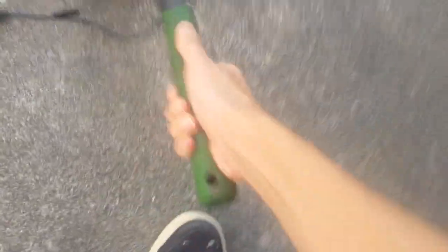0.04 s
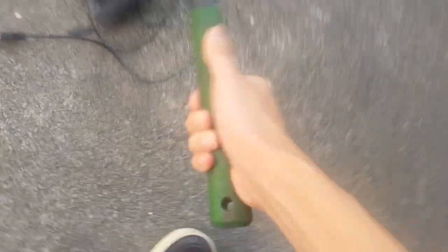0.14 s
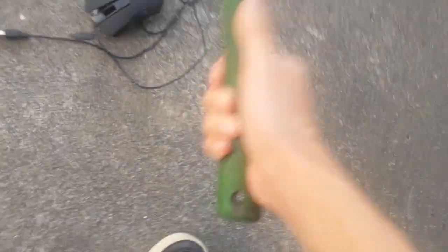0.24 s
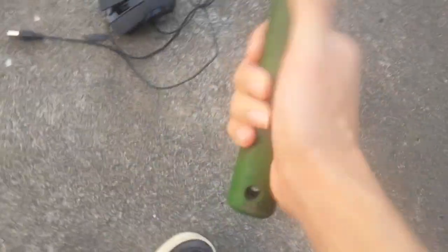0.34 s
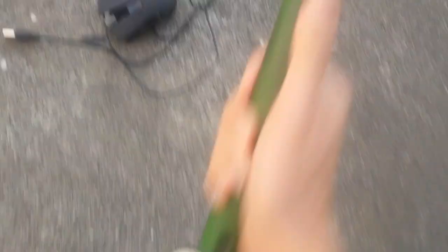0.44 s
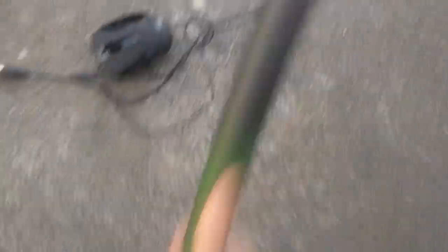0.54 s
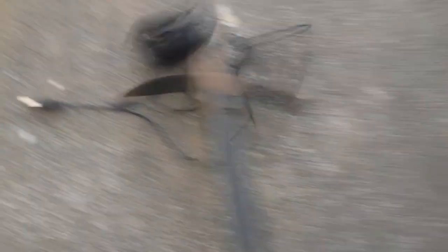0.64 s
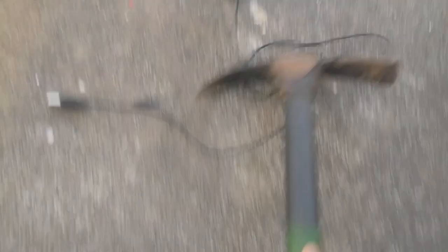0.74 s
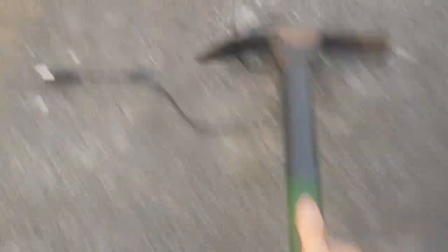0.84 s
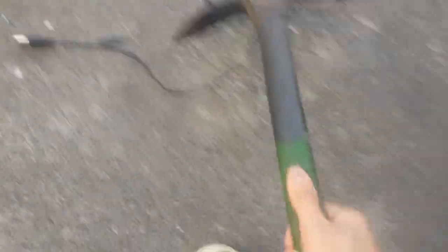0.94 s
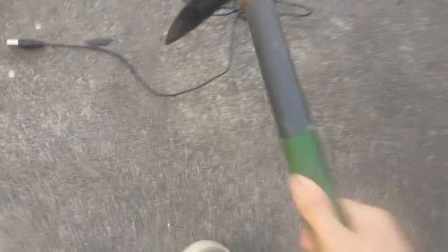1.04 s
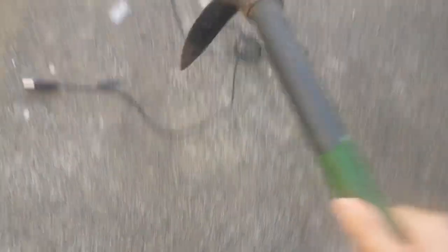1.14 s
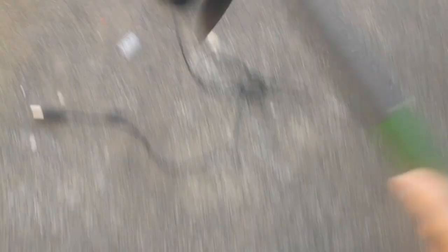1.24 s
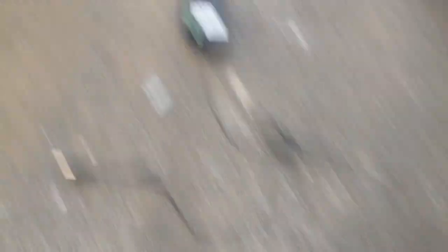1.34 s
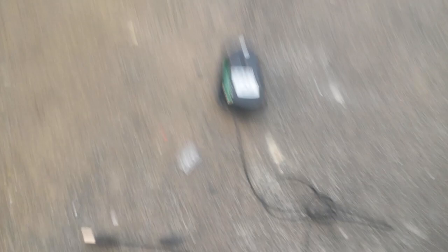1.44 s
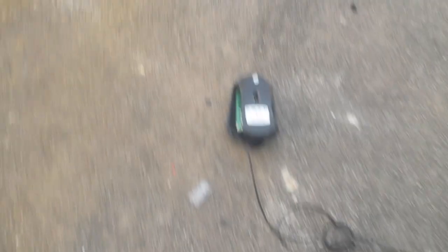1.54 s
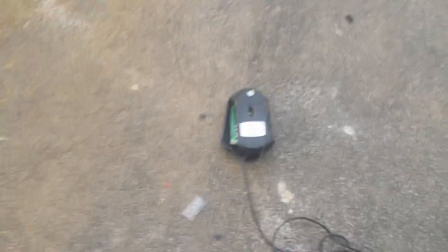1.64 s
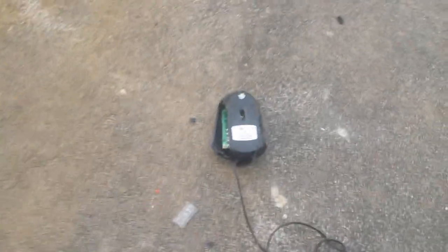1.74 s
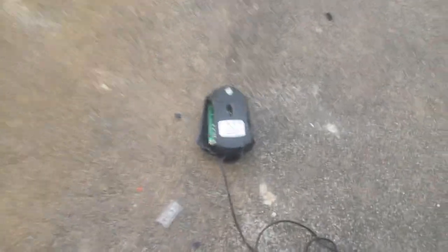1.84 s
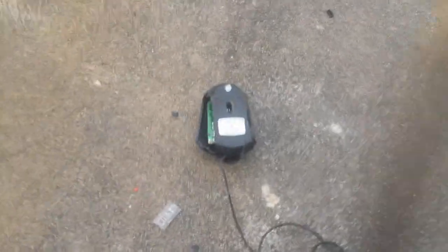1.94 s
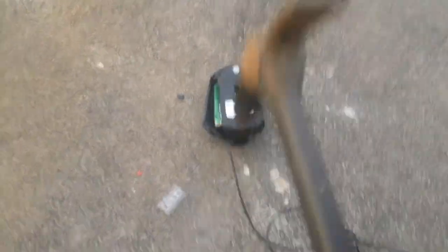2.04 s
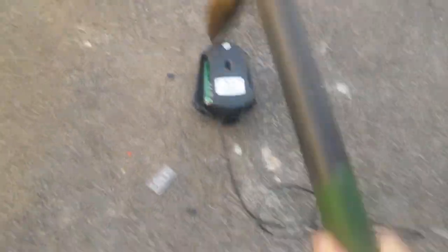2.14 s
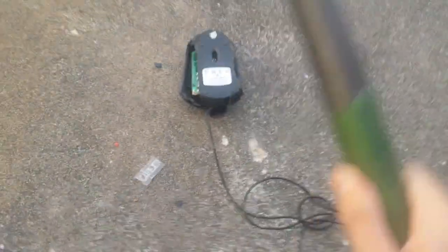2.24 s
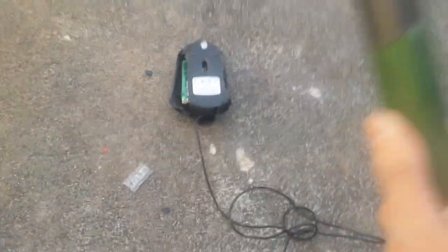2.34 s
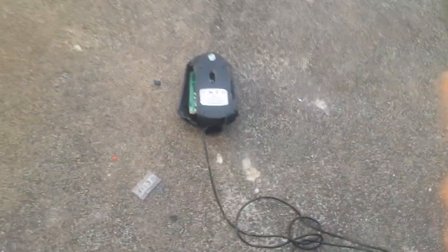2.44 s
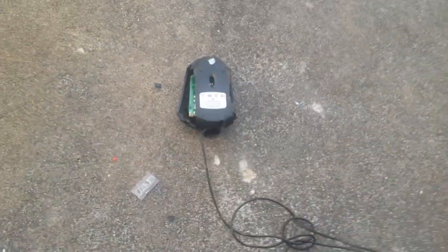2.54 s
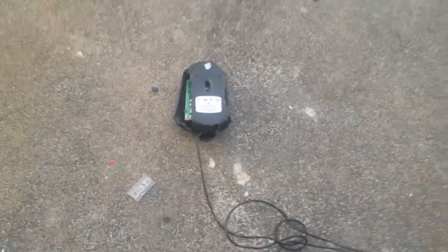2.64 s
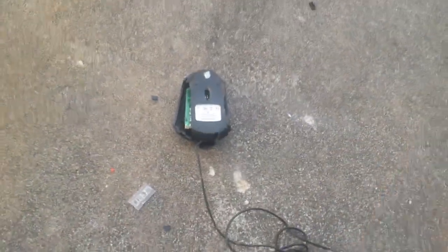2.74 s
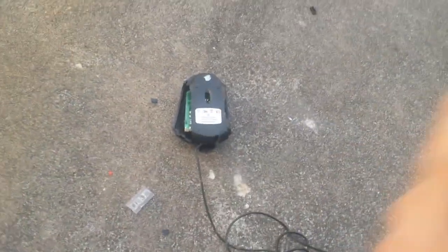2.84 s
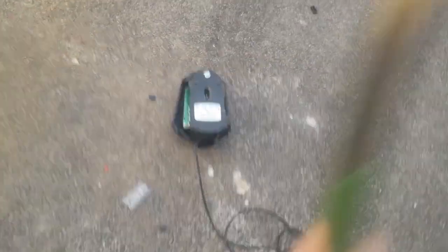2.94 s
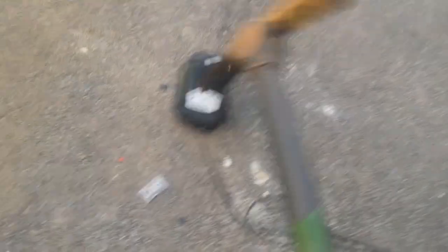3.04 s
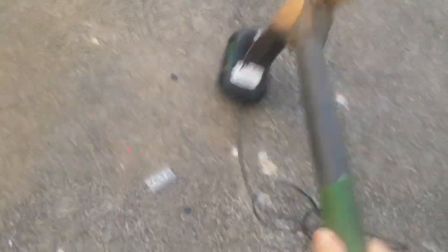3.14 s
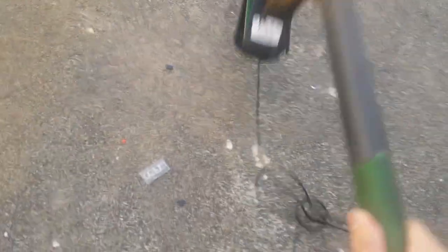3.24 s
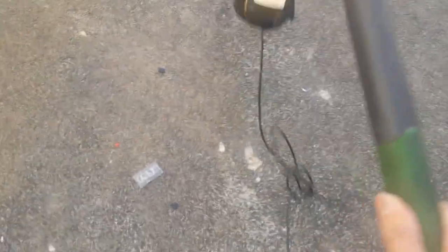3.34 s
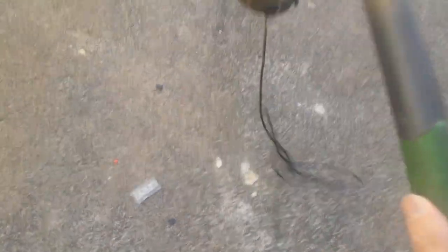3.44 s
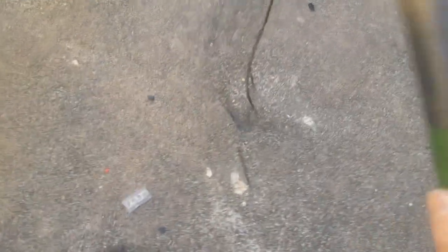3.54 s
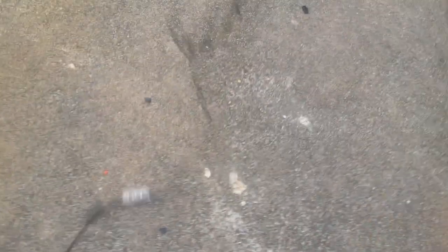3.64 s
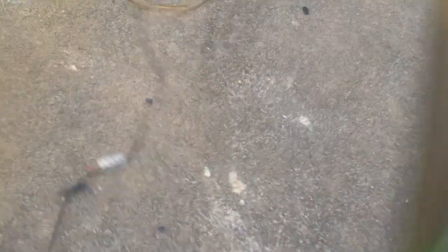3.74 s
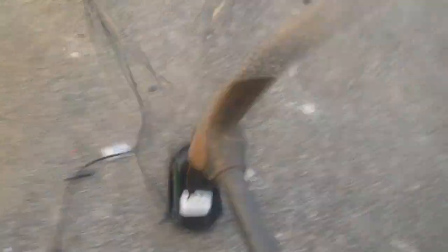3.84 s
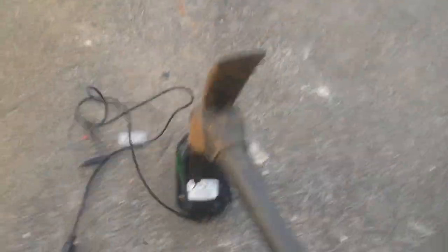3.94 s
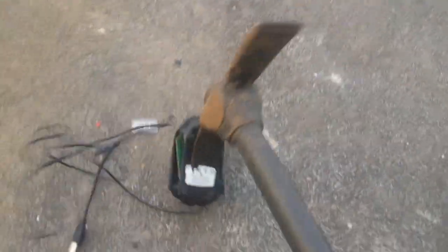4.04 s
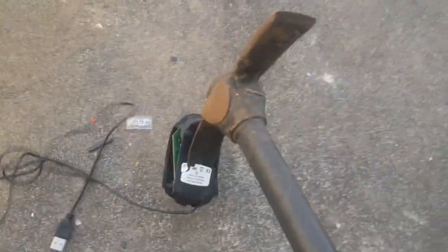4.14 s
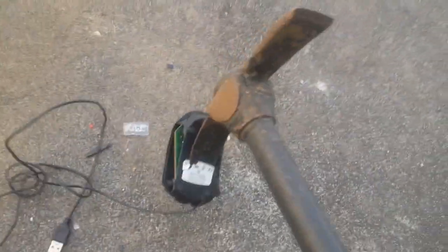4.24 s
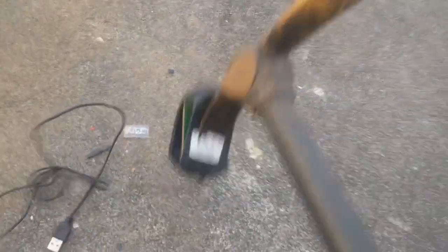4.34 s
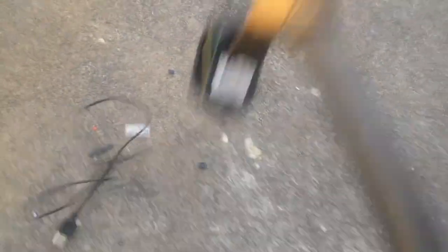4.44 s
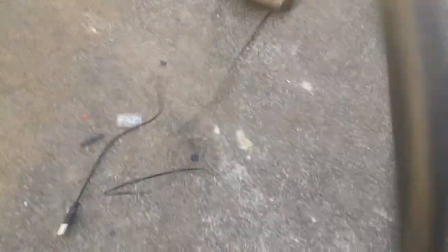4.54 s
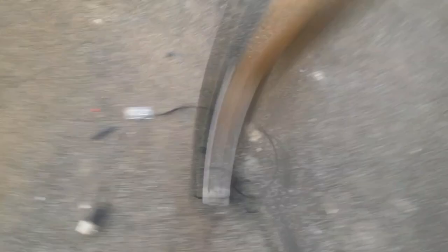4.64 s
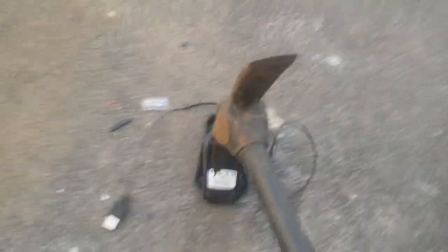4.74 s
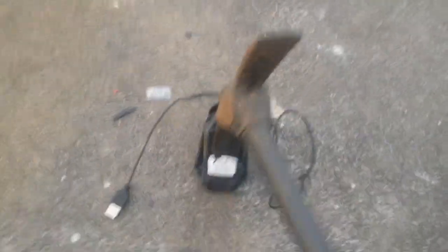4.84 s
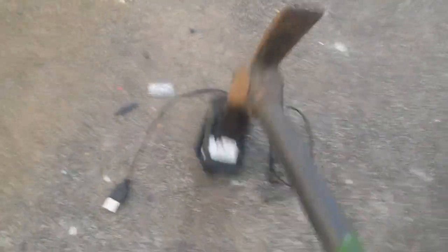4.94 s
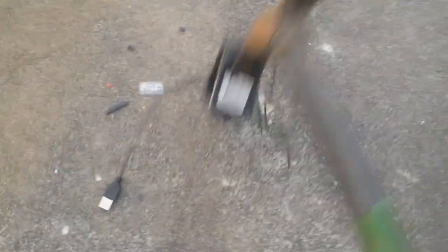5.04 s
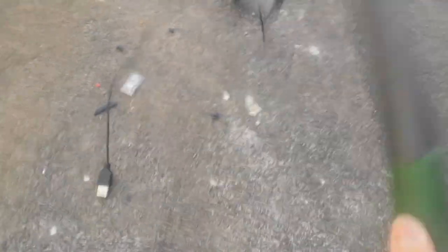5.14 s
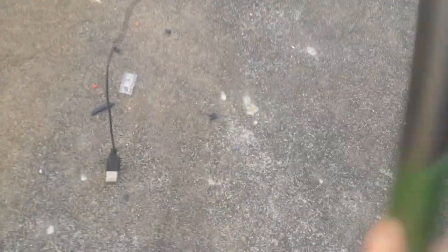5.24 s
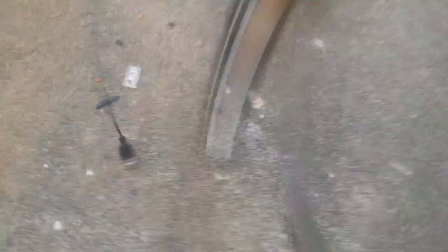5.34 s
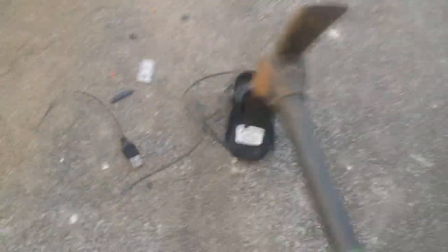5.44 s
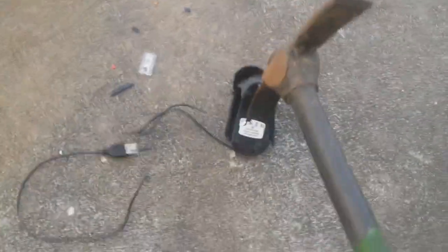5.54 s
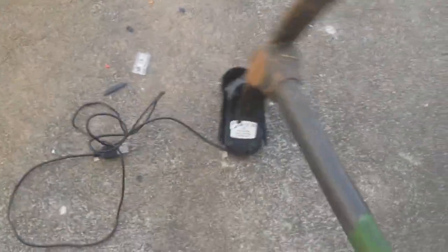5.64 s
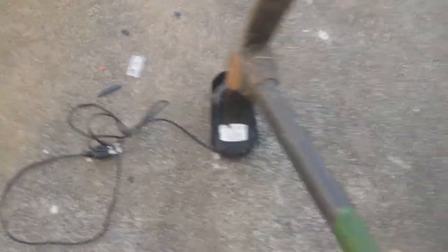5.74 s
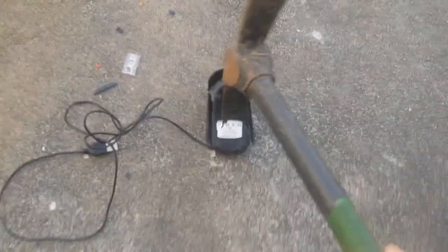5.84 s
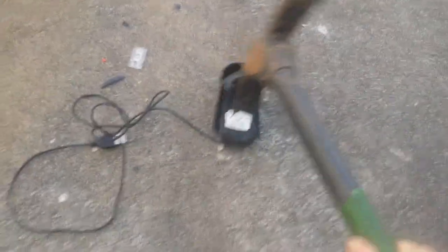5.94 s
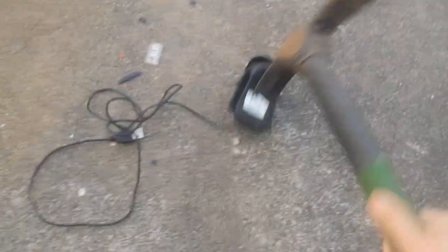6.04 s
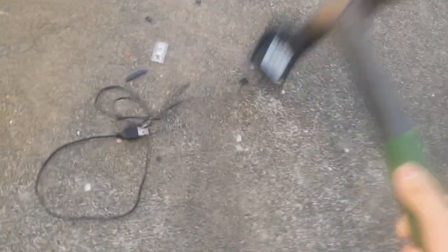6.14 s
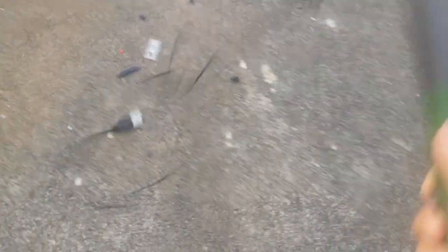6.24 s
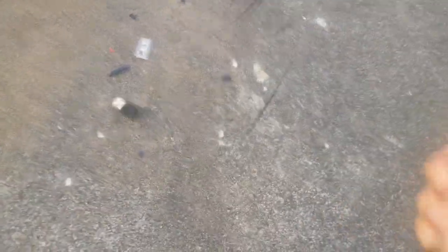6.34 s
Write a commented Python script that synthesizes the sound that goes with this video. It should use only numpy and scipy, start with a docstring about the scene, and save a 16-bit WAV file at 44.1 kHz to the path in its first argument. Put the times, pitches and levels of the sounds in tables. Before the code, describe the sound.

A light metallic tick and small plastic rattles lead to a loud pick blow with a steel ring on concrete. Five more blows follow, first after a longer pause, then roughly every second or less, each a dry plastic crack with a short low thud. The broken shell scrapes and tumbles between them. Very quiet moving air, distant engine and a few bird calls; close, bright stereo pickup.

```python
"""A steel pick smashes a plastic computer mouse on concrete, six blows, close to a hand-held camera.
Each blow is a burst of tiny cracks, shaped noise, over a decaying low sine and a short panel resonance.
Between blows the shell clatters and skids as noise grains; pick head and cable plug ring as dying sines.
Walls answer briefly as scattered echoes. Far off, gliding sines make an engine speeding up and bird
calls, over noise for traffic and moving air. Two microphone ports colour it all and overload softly."""
import sys
import numpy as np
from scipy import signal
from scipy.io import wavfile
from scipy.ndimage import uniform_filter1d

SR = 44100
rng = np.random.default_rng(int(sys.argv[2]) if len(sys.argv) > 2 else 0)


def transcribe(signal):
    """Save signal, clipped to [-1, 1], as a 16-bit WAV file at the path in sys.argv[1]."""
    frames = np.atleast_2d(signal).T
    limited = np.clip(frames, -1, 1)
    pcm = np.round(limited * 32767).astype(np.int16)
    wavfile.write(sys.argv[1], SR, pcm)


N = 282240

# Levels in the event tables are relative: each layer adds its own gain, then the microphone colours it.

# Background
# air spectrum: freq_hz, level_db
AIR_SPECTRUM = [(20, -23.5), (50, -10.5), (110, 1.5), (200, -3), (350, -9.5), (700, -12), (1300, -16.5),
                (2400, -25.5), (4500, -26.5), (7000, -33.5), (9000, -36), (12000, -51.5), (16000, -60.5)]
# air, likeness of left and right: freq_hz, likeness (-1 to 1)
AIR_LIKENESS = [(60, 0.81), (200, 1), (640, .5), (1400, -0.47), (3000, 0), (15000, -0.21)]
# the air swells and sinks again: top_s, rise_s, fall_s, rumble_db, rush_db
SWELLS = [(0.901, 0.66, 0.15, -4, 6.5), (2.019, 0.21, 0.11, 11, 11), (2.5, .1, 0.15, 5.5, 1.5)]
# far engine, one curve for each run up through a gear: time_s, pitch_hz, hum_db, whine_db
ENGINE_RUNS = [
    [(0, 100.4, -54, -52), (.12, 110.8, -67, -73.5), (.4, 118.1, -58.5, -71), (.58, 124.7, -57.5, -69),
     (1.0, 132.7, -68.5, -80)],
    [(3.3, 129.1, -65, -87.5), (4.5, 172.2, -68.5, -91), (5.25, 180.7, -59.5, -99.5),
     (5.95, 197.8, -64.5, -98), (6.4, 225.7, -65, -91)],
]
# whine on multiples of the engine's pitch: multiple, level_db
WHINE_ORDERS = [(3, -3), (5, 1), (9, 0)]
# far birds: start_s, length_s, start_hz, end_hz, level_db
CHIRPS = [(2.29, 0.053, 811, 810, -65), (2.594, 0.043, 3600, 3720, -76.5),
          (2.735, 0.071, 3850, 3510, -74.5), (3.494, 0.16, 4760, 4160, -74)]
# tail from the walls: freq_hz, t60_s
WALL_DECAY = [(100, 0.35), (700, 0.38), (2000, 0.4), (7000, 0.44), (11000, 0.34), (16000, 0.13)]
# wall tail, likeness of left and right: freq_hz, likeness (0 to 1)
WALL_LIKENESS = [(60, 0.8), (130, 1), (290, 0.99), (640, 0.03), (1400, 0.6), (3100, 0.01), (6800, 0.04)]

# Cable plug
# the metal plug is jerked up and bounces: start_s, level_db, first_hop_s,
# hop_ratio (each hop as a share of the one before), first_bounce_loss_db
PLUG_HOPS = [(0.0354, -28.5, .047, .7, 16), (0.9158, -16.5, .1215, .565, 12.5),
             (3.7075, -43, .0395, .85, -1), (5.1257, -43, .0458, .78, 4)]
# the plug is dragged along and its sleeve sings: start_s, length_s, level_db
PLUG_SLIDES = [(1.11, .025, -65), (3.694, 0.044, -57.5), (5.131, 0.316, -72)]
# modes of the plug's sleeve: freq_hz, level_db, t60_s (at damping 1)
PLUG_MODES = [(8400, 11.5, 0.051), (6430, 2, 0.016), (7340, 1, 0.0098)]
# spectrum of the plug's tick: freq_hz, level_db
TICK_SPECTRUM = [(1000, -33), (4500, -7), (6000, -8), (8300, -6), (9500, -9), (16000, -26.5)]

# Plastic shell
# the shell and its cable drag over the concrete: start_s, length_s, grit_db
SKIDS = [(0.165, 0.071, -51), (1.002, 0.22, -56.5), (1.754, 0.024, -54.5), (3.086, 0.025, -34),
         (3.125, 0.054, -30), (3.797, 0.03, -46.5), (5.112, 0.24, -64), (6.073, 0.032, -53.5)]
# the shell drops back on one edge, then the other, skidding as it lands: start_s, crack_db,
# hollow_db (body relative to the crack), edge_gap_s, skid_db
LANDINGS = [(0.939, -29, -24, 0.0075, -31.5), (3.1647, -18.5, -28, 0.016, -29),
            (3.9864, -19.5, -31, 0.0048, -56), (4.7995, -12.5, -14.5, 0.0031, -56),
            (5.4926, -13.5, -17.5, .003, -37)]
# single knocks as the shell is nudged, snaps further or tips over: start_s, crack_db
CLATTER = [(0.2098, -33), (0.2828, -42), (0.3317, -45.5), (0.839, -26), (3.0736, -8), (3.0915, -7.5),
           (3.1055, -13), (3.8164, -35), (3.8278, -35), (3.8357, -34.5), (3.8672, -28.5), (3.8881, -29),
           (3.9017, -20.5), (4.6084, -45), (4.7043, -27.5), (4.718, -20.5), (4.985, -46), (5.3762, -42),
           (5.7272, -30), (5.7414, -46.5), (5.8033, -36), (5.9849, -30.5), (6.0357, -42), (6.119, -31.5),
           (6.1584, -37.5)]
# flying chips hit something right by the microphone: start_s, crack_db, hollow_db (relative to the crack)
CHIPS = [(2.1237, -9.5, -9.5), (2.1529, -18, -8)]
# spectrum of cracking plastic, also used for grit: freq_hz, level_db
CRACK_SPECTRUM = [(200, -37), (2000, -4), (4500, 1.5), (7000, 1), (9500, -2.5), (12000, -5.5), (16000, -6)]
# spectrum of the hollow shell: freq_hz, level_db
BODY_SPECTRUM = [(100, -16), (350, -8), (600, -12), (900, -7.5), (1300, -11), (2050, -1.5), (2600, -3.5),
                 (3400, -1.5), (4300, -6), (5500, -11.5), (9000, -30)]

# Blows of the pick
# steel meets concrete: start_s, knock_db, grit_db, ring_db, damping (factor on the decay rate)
STRIKES = [(0.7, -11.5, -25, -25.5, 1.37), (0.705, -15.5, -21.5, -15.5, 0.82), (0.7557, -23, -30.5, -41, 2),
           (2.0675, -33, -12, -16.5, 1.3)]
# modes of the pick head: freq_hz, level_db, t60_s (at damping 1)
STEEL_MODES = [(725, -20, .28), (860, -25, .08), (2907, -10, .11), (2982, -2, .1), (3031, -7, .16),
               (3607, -24, .15), (5825, -22, .1), (7290, -17, .1), (7935, 0, .14)]
# spectrum of steel on stone: freq_hz, level_db
KNOCK_SPECTRUM = [(100, -22.5), (600, -11.5), (1200, 0.5), (1900, 0.5), (3000, 2), (4500, -4), (9000, -24),
                  (16000, -29)]
# the blow reaches the floor and puffs air at the microphone: start_s, level_db, pitch_hz,
# decay_s, left_minus_right_db
THUDS = [(0.7, -31, 210.2, 0.0081, 2), (2.063, -18.5, 214.4, 0.0049, 0), (3.065, -22.5, 233, 0.0032, 9.5),
         (3.073, -23, 129.3, 0.0034, 15), (3.908, -19, 148.5, 0.0017, 5),
         (4.725, -30.5, 207.8, 0.012, -3.5), (5.423, -25, 222, 0.0064, 1)]
# the pick crushes the shell: start_s, crack_db, hollow_db (relative to the crack), crush_s, # panel_hz (pitch
# of a short resonance: the breaking panel, at the second blow a low knock of the pick on the concrete), #
# panel_db (relative to the crack)
BLOWS = [(0.6776, -7, -19, 0.0053, 3057, -4.5), (2.0624, -11.5, -7.5, 0.006, 824, -7.5),
         (3.0622, -6, -12, 0.0061, 2037, -6.5), (3.9054, -9.5, -18, 0.0072, 3400, -31.5),
         (4.7237, -6, -16, 0.0053, 2573, -10.5), (5.4212, -14, -12, 0.013, 2450, -28)]

# Microphone
# colour of the left port with its cavity peak: freq_hz, level_db
LEFT_PORT = [(100, -1), (700, 1.5), (1400, 0), (2300, 1), (3300, -1), (5000, 3.5), (5900, 10), (6750, 16.5),
             (7700, 9.5), (9000, 3), (11000, -6), (15500, -9)]
# colour of the right port with its cavity peak: freq_hz, level_db
RIGHT_PORT = [(100, -1), (700, 0.5), (1400, 2), (2100, 2.5), (3300, -5), (5000, -3.5), (5900, -6.5),
              (6750, 2.5), (7500, 10), (8000, 10.5), (9000, 2.5), (11000, -0.5), (15500, -12)]

RUMBLE_DB, RUSH_DB, HISS_DB = -60.5, -65.5, -72  # resting rms of the air's bass, middle and treble
HISS_FOLLOWS = 0.69  # dB of hiss for each dB that the rush swells
SKID_LEAD_S, SKID_S = 0.014, 0.044  # a landing's skid starts just before the first edge hits
SKID_HOLLOW_DB = -9.5  # hollow body relative to the grit
CLATTER_CONTACT_S, LANDING_CONTACT_S = 0.0041, 0.0031
SECOND_EDGE_DB = 1  # second edge of a landing relative to the first
# hollow body relative to a crack of this table level; softer knocks are hollower (dB per dB)
HOLLOW_DB, HOLLOW_AT_DB, HOLLOW_SLOPE = -19.5, -31.5, 0.74
# overtone of the thud: multiple of its pitch, relative level, longest decay time
THUD_OVERTONE, THUD_OVERTONE_DB, THUD_OVERTONE_DECAY_S = 1.6, -7, 0.0033
OVERLOAD_LEVEL = 0.72  # ceiling of the soft overload
BAND_EDGE_HZ = 15900


def amp(db):
    """Decibels to gain."""
    return 10 ** (np.asarray(db) / 20)


def evened(x):
    """Scales to rms 1."""
    return x / np.sqrt(np.mean(x ** 2) + 1e-20)


def read(points, hz):
    """Reads a table on a log-frequency axis."""
    f, value = np.transpose(points)
    return np.interp(np.log(hz + 1), np.log(f + 1), value)


def add(mix, s, sound):
    """Mixes a sound in at time s, cut off at the end of the mix."""
    start = max(round(s * SR), 0)
    part = mix[:, start:][:, :sound.shape[-1]]
    part += sound[..., :part.shape[1]]


def causal(points, size=1024):
    """The shortest impulse response with this spectrum (minimum phase)."""
    hz = abs(np.fft.fftfreq(size, 1 / SR))
    log_gain = np.log(amp(read(points, hz)))
    return np.fft.ifft(np.exp(np.conj(signal.hilbert(log_gain)))).real


def blend(likeness, first, second):
    """A left and right pair of equal power, alike by the given share in each band."""
    right = likeness * first + np.sqrt(1 - likeness ** 2) * second
    return np.array([first, right])


def ring(modes, damping=1, size=16384):
    """Dying sines, one for each mode; damping speeds up every decay."""
    t = np.arange(size) / SR
    tone = np.zeros(size)
    for hz, db, t60 in modes:
        tone += amp(db - 60 * damping * t / t60) * np.sin(2 * np.pi * hz * t)
    return tone


def fracture(spectrum, length, spread_db=3.0, apart=0.8, size=2048):
    """A burst of tiny cracks of uneven size, of rms 1 over its length; high ones differ between the ports."""
    t = np.arange(size) / SR
    length = max(length, 1e-4)
    sizes = amp(spread_db * np.repeat(rng.standard_normal(size // 16), 16))
    force = (1 - np.exp(-t / (0.15 * length))) * np.exp(-(t / length) ** 2)
    cracks = rng.standard_normal((3, size)) * sizes * force
    # one row is shared by both ports, the other two add separate treble
    treble = signal.lfilter(*signal.butter(1, 4500, "high", fs=SR), cracks[1:])
    burst = signal.fftconvolve(cracks[0] + apart * treble, causal(spectrum)[None], axes=1)
    return burst * np.sqrt(2 * length * SR / np.sum(burst ** 2))


def air(patchy_db=2.0):
    """Far traffic and moving air: noise whose rumble and rush swell now and then; the hiss follows the rush."""
    hz = np.fft.rfftfreq(2048, 1 / SR)
    a, b, c, d, patches = rng.standard_normal((5, len(hz), N // 512 + 5))
    likeness = np.clip(read(AIR_LIKENESS, hz), -1, 1)[:, None]
    noise = blend(likeness, a + 1j * b, c + 1j * d)
    # smoothing over frequency, then time, leaves slow uneven patches
    patches = uniform_filter1d(uniform_filter1d(patches, size=6, axis=0), size=10, axis=1)
    noise = noise * amp(read(AIR_SPECTRUM, hz)[:, None] + patchy_db * evened(patches))

    t, rumble, rush = np.arange(N) / SR, 0, 0
    for s, rise, fall, rumble_db, rush_db in SWELLS:
        swell = np.exp(-abs(t - s) / np.where(t < s, rise, fall))
        rumble = rumble + rumble_db * swell
        rush = rush + rush_db * swell
    levels = RUMBLE_DB + rumble, RUSH_DB + rush, HISS_DB + HISS_FOLLOWS * rush

    band = np.digitize(hz, [300, 2500])[:, None]  # 0 rumble, 1 rush, 2 hiss
    out = np.zeros((2, N))
    for k, db in enumerate(levels):
        sound = signal.istft(noise * (band == k), nperseg=2048, noverlap=1536)[1][:, :N]
        out += amp(db) * evened(sound)
    return out


def glide(rows, waver):
    """A distant tone that follows its pitch and level curve (s, Hz, dB) and wavers on the way."""
    s, hz, db = np.transpose(rows)
    t = np.arange(s[0], s[-1], 1 / SR)
    knots = np.linspace(0, N / SR, 200)
    drift, fade = (np.interp(t, knots, v) for v in rng.standard_normal((2, 200)))
    turns = np.cumsum(np.interp(t, s, hz) * (1 + waver * drift)) / SR
    level = np.sqrt(2) * amp(np.interp(t, s, db) + 2 * fade)
    return level * np.sin(2 * np.pi * turns) * signal.windows.tukey(len(t), 0.3)


def engine(hum_gain_db=-1):
    """A far engine speeding up: a hum at its pitch and a whine on multiples of it."""
    out = np.zeros((2, N))
    for run in ENGINE_RUNS:
        start = run[0][0]
        hum = [(s, hz, db) for s, hz, db, _ in run]
        add(out, start, amp(hum_gain_db) * glide(hum, waver=0.0073))
        for multiple, order_db in WHINE_ORDERS:
            whine = [(s, multiple * hz, db + order_db) for s, hz, _, db in run]
            add(out, start, glide(whine, waver=0.006))
    return out


def birds():
    """Far birds, each call one tone sliding from its start pitch to its end pitch."""
    out = np.zeros((2, N))
    for s, length, start_hz, end_hz, db in CHIRPS:
        add(out, s, glide([(s, start_hz, db), (s + length, end_hz, db)], waver=0.0159))
    return out


def walls(x, near_db=-6.5, near_t60=0.13, far_db=-22, build_up=0.0012):
    """Quick scatter off the floor and nearby things, then a short tail from the walls."""
    t = np.arange(SR // 2) / SR
    # sparse random pulses, about 4000 a second
    near, far = rng.standard_normal((2, 2, len(t))) * (rng.random((2, 2, len(t))) < 4000 / SR)
    near = near * amp(-60 * t / near_t60) * (t > 0.003)

    hz, at, bands = signal.stft(far * (1 - np.exp(-t / build_up)), SR, nperseg=256)
    likeness = np.clip(read(WALL_LIKENESS, hz), -1, 1)[:, None]
    bands = blend(likeness, bands[0], bands[1])
    decay = amp(-60 * at / read(WALL_DECAY, hz)[:, None])
    far = signal.istft(bands * decay, SR, nperseg=256)[1][:, :len(t)]

    echo = (amp(near_db) * evened(near) + amp(far_db) * evened(far)) / np.sqrt(len(t))
    return signal.fftconvolve(x, echo, axes=1)[:, :N]


def plug_bounces(count=5):
    """Each hop of the plug is shorter than the last; its level changes most at the first bounce: rows (s, dB)."""
    rows = []
    for s, db, hop, ratio, loss_db in PLUG_HOPS:
        for k in range(count):
            rows.append((s, db - loss_db * np.sqrt(k)))
            s += hop * ratio ** k
    return rows


def plug_ticks(tick_db=-7, contact=0.00058):
    """The metal sleeve ticks on the floor at each bounce, a very short contact."""
    out = np.zeros((2, N))
    for s, db in plug_bounces():
        add(out, s, amp(db + tick_db) * fracture(TICK_SPECTRUM, contact))
    return out


def plug_rings(sleeve_db=-21):
    """The plug's sleeve rings on in its own modes after each bounce."""
    out = np.zeros((2, N))
    for s, db in plug_bounces():
        add(out, s, amp(db + sleeve_db) * ring(PLUG_MODES))
    return out


def plug_slides(spread_db=6.5):
    """Grains of concrete keep the dragged sleeve ringing, damped by the floor."""
    out = np.zeros((2, N))
    for s, length, db in PLUG_SLIDES:
        sizes = amp(spread_db * np.repeat(rng.standard_normal(SR // 90), 45))
        catches = rng.standard_normal(SR // 2) * sizes
        grains = catches[:int(length * SR)]
        song = signal.fftconvolve(grains * signal.windows.tukey(len(grains), 0.3), ring(PLUG_MODES, damping=2))
        add(out, s, amp(db) * song * np.sqrt(len(grains) / np.sum(song ** 2)))
    return out


def skids(spread_db=6.0, level_db=-8):
    """Plastic catches on grain after grain of the concrete, and each catch sounds the shell."""
    out = np.zeros((2, N))
    landing_skids = [(s - SKID_LEAD_S, SKID_S, db) for s, _, _, _, db in LANDINGS]
    for s, length, db in SKIDS + landing_skids:
        catches = amp(spread_db * np.repeat(rng.standard_normal(SR // 30), 30))
        grains = (rng.standard_normal((2, SR)) * catches)[:, :int(length * SR)]
        grains = grains * signal.windows.tukey(grains.shape[1])
        grit = evened(signal.lfilter(causal(CRACK_SPECTRUM), 1, grains))
        body = evened(signal.lfilter(causal(BODY_SPECTRUM), 1, grains))
        add(out, s, amp(db + level_db) * (grit + amp(SKID_HOLLOW_DB) * body))
    return out


def shell_contacts():
    """Single knocks and both edges of each landing: rows (s, crack dB, hollow dB, contact s)."""
    rows = []
    for s, db in CLATTER:
        hollow_db = HOLLOW_DB - HOLLOW_SLOPE * (db - HOLLOW_AT_DB)
        rows.append((s, db, hollow_db, CLATTER_CONTACT_S))
    for s, db, hollow_db, gap, _ in LANDINGS:
        rows.append((s, db, hollow_db, LANDING_CONTACT_S))
        rows.append((s + gap, db + SECOND_EDGE_DB, hollow_db, LANDING_CONTACT_S))
    return rows


def plastic(rows, crack_db, body_db):
    """Each contact cracks sharply and sounds the hollow shell."""
    out = np.zeros((2, N))
    for s, db, hollow_db, length in rows:
        add(out, s, amp(db + crack_db) * fracture(CRACK_SPECTRUM, length))
        add(out, s, amp(db + hollow_db + body_db) * fracture(BODY_SPECTRUM, length))
    return out


def steel_knocks(contact=0.0032, grit_db=-6):
    """The pick head knocks on concrete and grinds grit."""
    out = np.zeros((2, N))
    for s, knock_db, scrape_db, _, _ in STRIKES:
        knock = amp(knock_db) * fracture(KNOCK_SPECTRUM, contact)
        grit = amp(scrape_db + grit_db) * fracture(CRACK_SPECTRUM, contact)
        add(out, s, knock + grit)
    return out


def steel_rings(head_db=-5):
    """The pick head rings on after each strike; it dies sooner when it stays pressed down."""
    out = np.zeros((2, N))
    for s, _, _, ring_db, damping in STRIKES:
        add(out, s, amp(ring_db + head_db) * ring(STEEL_MODES, damping))
    return out


def thuds(size=4096):
    """A low push with one overtone, over within a few cycles."""
    out, t = np.zeros((2, N)), np.arange(size) / SR
    for s, db, hz, decay, pan_db in THUDS:
        push = np.sin(2 * np.pi * hz * t) * np.exp(-t / decay)
        overtone_decay = min(decay, THUD_OVERTONE_DECAY_S)
        overtone = np.sin(2 * np.pi * THUD_OVERTONE * hz * t) * np.exp(-t / overtone_decay)
        sides = amp(db + np.array([[pan_db], [-pan_db]]) / 2)
        add(out, s, -sides * (push + amp(THUD_OVERTONE_DB) * overtone))  # first swing is negative
    return signal.lfilter(*signal.butter(2, 70, "high", fs=SR), out)


def panels(level_db=-5, width_hz=260):
    """At each blow one short, hollow resonance sounds: mostly the breaking panel, at the second blow a low
    knock of the pick on the concrete."""
    out = np.zeros((2, N))
    for s, db, _, length, hz, panel_db in BLOWS:
        resonance = signal.iirpeak(hz, hz / width_hz, fs=SR)
        tone = signal.lfilter(*resonance, fracture(BODY_SPECTRUM, length))
        add(out, s, amp(db + panel_db + level_db) * tone * np.sqrt(2 * length * SR / np.sum(tone ** 2)))
    return out


def blows():
    """The pick crushes the shell: cracks and hollow body, a short resonance and the thud."""
    crushes = plastic([row[:4] for row in BLOWS], crack_db=-3.5, body_db=2)
    return crushes + panels() + thuds()


def scene():
    """Contacts on the floor sound through the walls; the chips and the thin metal rings are heard directly."""
    clatter = plastic(shell_contacts(), crack_db=-14, body_db=-2.5)
    floor = plug_ticks() + skids() + clatter + steel_knocks() + blows()
    chips = plastic([(*row, 0.0006) for row in CHIPS], crack_db=-10.0, body_db=5)  # 0.6 ms contacts
    direct = chips + steel_rings() + plug_rings() + plug_slides()
    return air() + engine() + birds() + walls(floor) + floor + direct


def record(dry):
    """Port resonances, soft overload on the blows, then the band limit."""
    left = np.pad(causal(LEFT_PORT), (0, 2))
    right = np.pad(causal(RIGHT_PORT), (2, 0))  # sound reaches the right port two samples later
    ports = signal.oaconvolve(dry, np.array([left, right]), axes=1)[:, :N]
    squashed = ports / (1 + (ports / OVERLOAD_LEVEL) ** 4) ** (1 / 4)
    band_limit = signal.firwin(255, BAND_EDGE_HZ, window=("kaiser", 9), fs=SR)
    return signal.oaconvolve(squashed, band_limit[None], "same")


dry = scene()
out = record(dry)
transcribe(out)
```